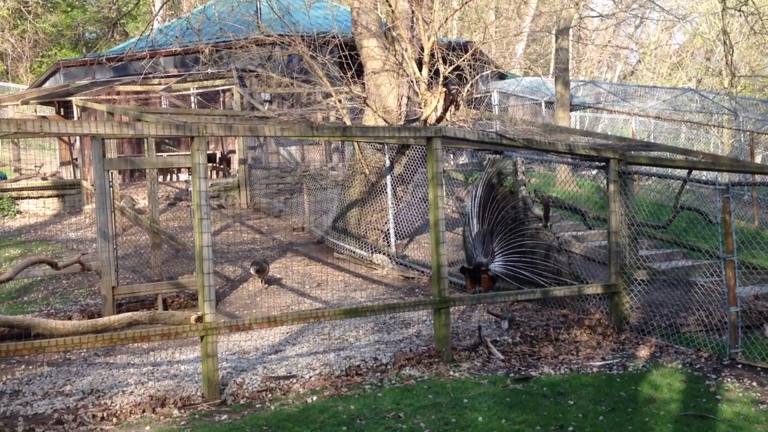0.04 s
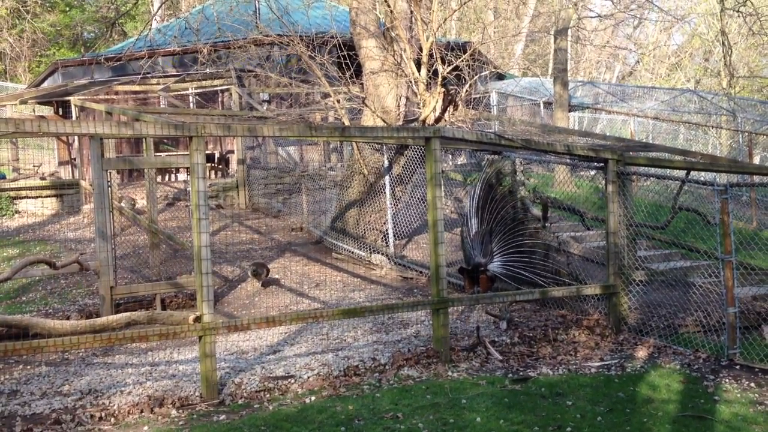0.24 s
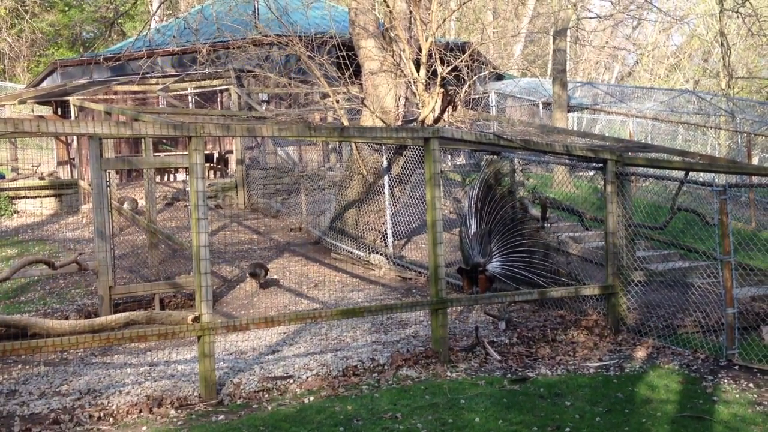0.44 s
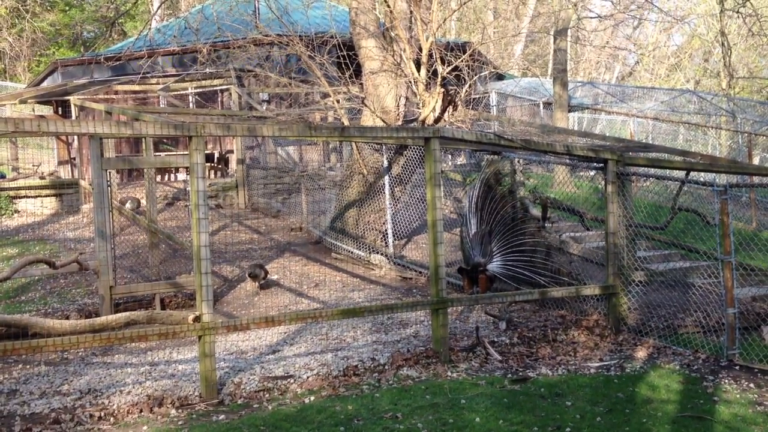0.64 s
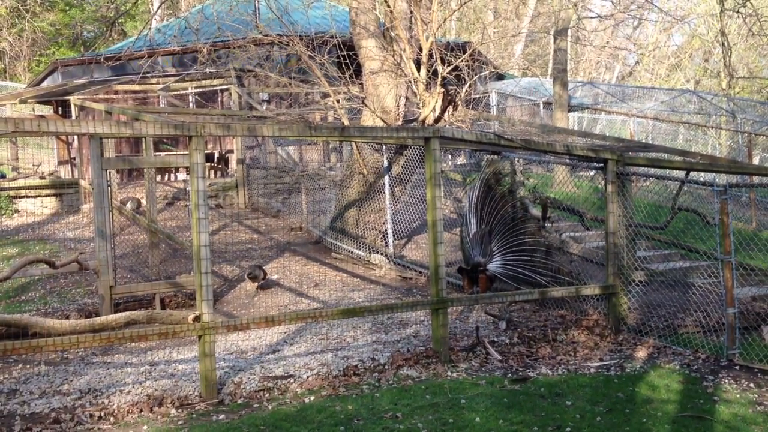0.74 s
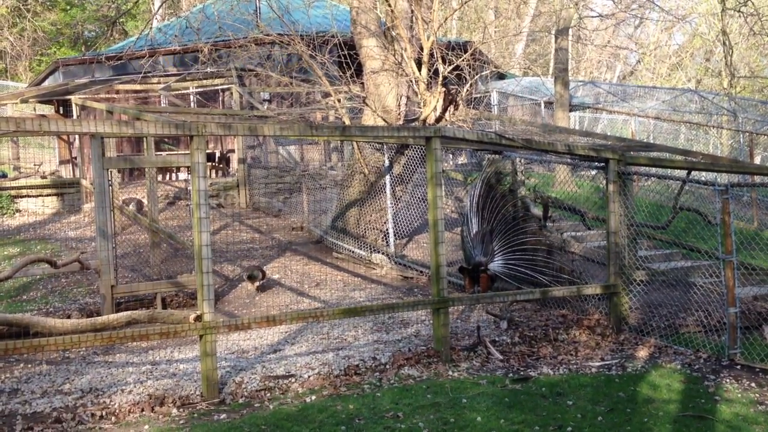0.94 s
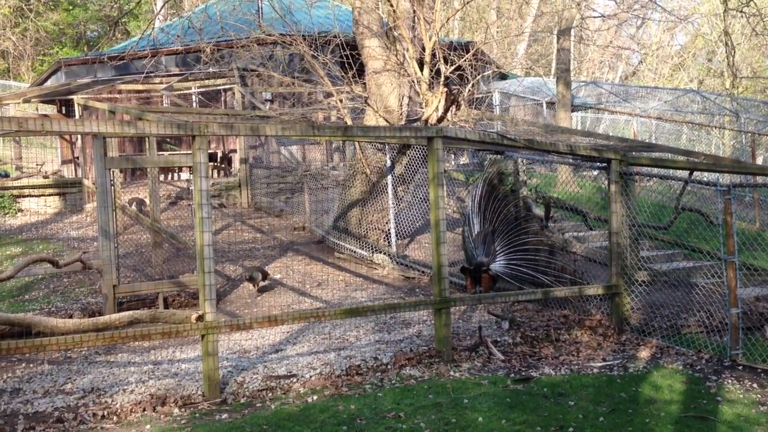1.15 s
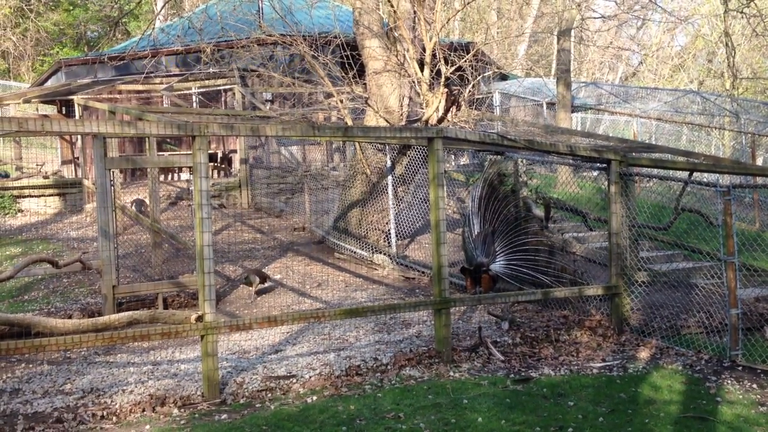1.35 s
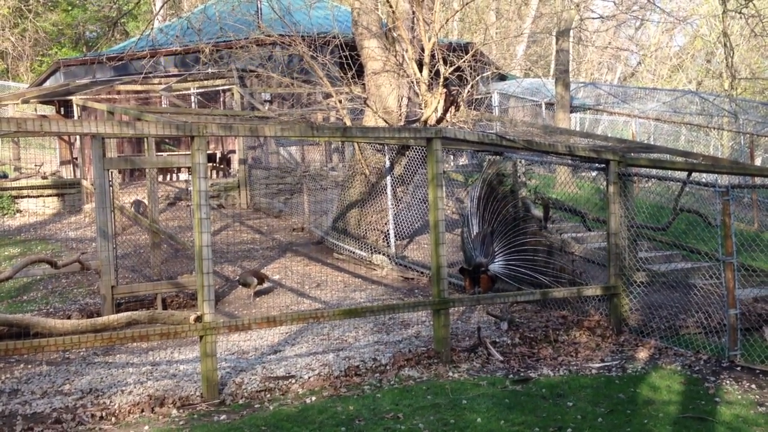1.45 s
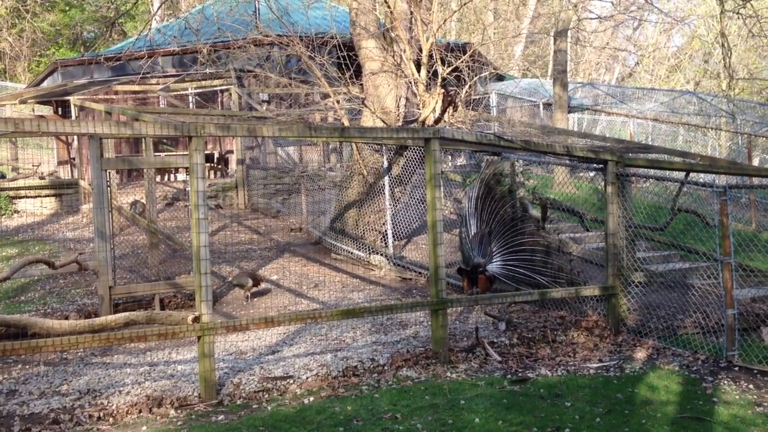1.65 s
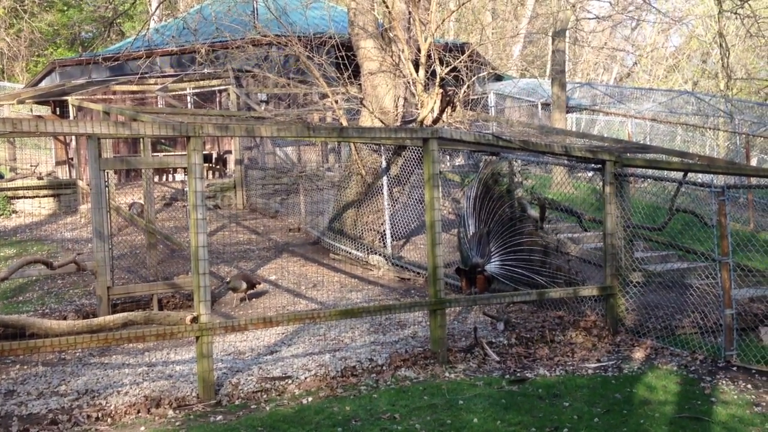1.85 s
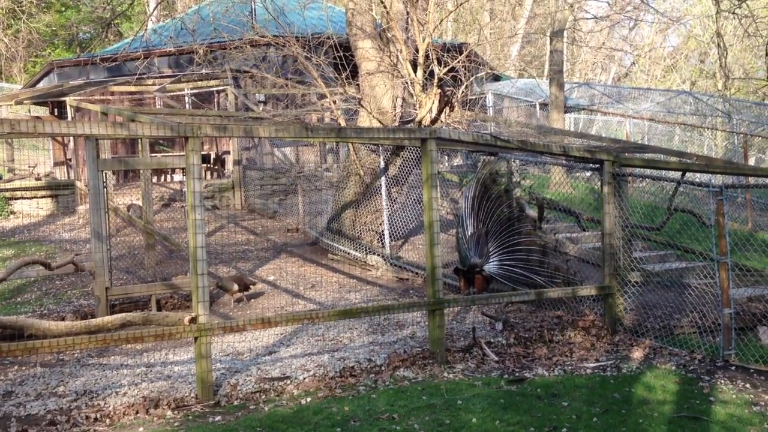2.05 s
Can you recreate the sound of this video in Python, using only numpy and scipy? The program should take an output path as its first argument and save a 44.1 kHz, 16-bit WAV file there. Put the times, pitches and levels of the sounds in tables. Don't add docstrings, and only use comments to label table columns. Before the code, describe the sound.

A peacock's single loud call dominates. First comes soft, low park air with very faint distant chirps, a feathery swish near 0.55 seconds and twig ticks around 0.75. At 1.13 dry clucks burst, then the voice stutters upward, opens into a bright, nasal, brassy arch around 1.6, and drops away by 1.95. A dove's faint hum lies beneath; a dull echo and quiet air remain.

```python
import sys
import numpy as np
from scipy import signal
from scipy.io import wavfile
from scipy.ndimage import uniform_filter1d

SR = 44100
rng = np.random.default_rng(int(sys.argv[2]) if len(sys.argv) > 2 else 0)


def transcribe(u):
    v = np.clip(np.atleast_2d(u).T, -1, 1)
    q = np.round(v * 32767).astype(np.int16)
    wavfile.write(sys.argv[1], SR, q)


def ratio_of_db(decibels):
    return 10 ** (np.asarray(decibels, float) / 20)


N = 92786

# pitch_hz [Hz], level_db [dB]
PARK_AIR = [(40, -27), (70, -2.5), (170, -1.5), (330, -5), (1000, -8.5), (2200, -23.5), (4800, -19.5),
            (7500, -36)]
# start_s [s], length_s [s], from_hz [Hz], to_hz [Hz], level_db [dB]
FAR_CHIRPS = [(-.03, 0.071, 5350, 3740, -60.5), (0.218, 0.047, 4820, 5180, -69.5),
              (0.294, .03, 3390, 4900, -73), (0.817, 0.039, 3720, 4780, -66),
              (0.86, 0.051, 5190, 3870, -65.5), (0.964, 0.089, 5210, 3780, -62.5),
              (1.165, 0.03, 4100, 3190, -57), (2.071, .06, 4280, 3300, -69.5)]
# start_s [s], peak_db [dB], pitch_hz [Hz], width_hz [Hz]
TWIG_TICKS = [(0.123, -35, 176, 73.5), (.122, -56, 420, 250), (.742, -29.5, 2300, 1540),
              (.742, -46, 6000, 3000), (.838, -44, 6000, 3000), (0.844, -47, 8000, 3000),
              (0.875, -36.5, 2040, 350), (1.095, -45, 3500, 4000), (1.096, -47, 1850, 120),
              (.622, -45.5, 7500, 2000), (1.558, -21, 9000, 9200), (1.57, -49, 9000, 8960)]
# time_s [s], centre_hz [Hz], level_db [dB]
WING_SWISH = [(.51, 5200, -74), (.55, 4600, -45.5), (.59, 3600, -45), (.64, 3200, -47), (.68, 3300, -54.5),
              (.76, 3400, -60), (.9, 3400, -67)]
# time_s [s], pitch_hz [Hz], level_db [dB]
DOVE_HUM = [(1.11, 165, -47), (1.17, 208.8, -48.5), (1.31, 220, -40), (1.44, 288, -47), (1.8, 270, -54),
            (1.86, 220.4, -47), (1.96, 256.2, -41.5), (2.02, 266, -49), (2.05, 250, -82.5)]
# centre_s [s], level_db [dB], length_s [s]
CLUCK_PUFFS = [(1.129, -33.5, 0.0065), (1.139, -22.5, 0.0079), (1.154, -25.5, 0.0098)]
# pitch_hz [Hz], width_hz [Hz], level_db [dB]
THROAT_RING = [(480, 230, -11.5), (1055, 150, -1), (2300, 170, -19.5), (11850, 5000, -48.5)]
# time_s [s], pitch_hz [Hz], level_db [dB], beak_opening [0-1]
CALL_EFFORT = [
    (1.172, 409.8, -20.5, 0.3),
    (1.22, 459.8, -12, 0),
    (1.27, 492.4, -3, 0.06),
    (1.4, 536.3, -4, 0),
    (1.49, 562.6, -4, 0.37),
    (1.62, 571.9, -0.5, 0.61),
    (1.77, 559.5, -2, 0.77),
    (1.84, 515.8, -7.5, 0.14),
    (1.955, 402.7, -34.5, 0.11),
]
# centre_s [s], depth_db [dB], closing_s [s], opening_s [s]
VOICE_CATCHES = [(1.177, 18, .003, .004), (1.196, 18.5, 0.0016, 0.0017), (1.209, 11, 0.0027, 0.0011),
                 (1.223, 15, 0.0017, 0.0053), (1.253, 22.5, 0.0068, 0.0017), (1.281, 20.5, 0.0057, 0.0052),
                 (1.319, 15.5, 0.0051, 0.002), (1.351, 7.5, 0.0036, .004), (1.394, 4, 0.0053, .002)]
# pitch_hz [Hz], width_hz [Hz], closed_db [dB], open_db [dB]
WINDPIPE = [(1161, 495, 18.5, 22.5), (1850, 830, -7.5, -15.5), (2590, 242, 18.5, 9), (3400, 390, -29.5, 17),
            (4000, 280, 5, -13), (4350, 9000, -23.5, -32.5), (5876, 550, -5, 29), (6490, 500, 13.5, 7),
            (7600, 1200, 4.5, -11), (9300, 700, 2, 8), (10650, 1500, -4, -15), (12500, 780, 12, 15.5),
            (15100, 3000, 2, 3)]
# delay_s [s], level_db [dB]
FAR_RETURNS = [(0.02, -25), (0.045, -39.5), (0.109, -40.5), (.19, -51.5), (.29, -61.5), (0.369, -74)]


def columns(rows):
    time_s, *values = np.transpose(rows)
    return [np.interp(np.arange(N) / SR, time_s, value) for value in values]


def drift(rate_hz):
    r = np.exp(-2 * np.pi * rate_hz / SR)
    x = signal.lfilter([1], [1, -2 * r, r * r], rng.standard_normal(N + SR))[SR:]
    return x / x.std()


def resonate(x, hz, width_hz):
    r = np.exp(-np.pi * width_hz / SR)
    return signal.lfilter([(1 - r * r) / 2, 0, (r * r - 1) / 2],
                          [1, -2 * r * np.cos(2 * np.pi * hz / SR), r * r], x)


def cut(x, hz, kind, order=2):
    return signal.sosfilt(signal.butter(order, hz, kind, fs=SR, output="sos"), x)


def air(patchy_db):
    level_db, hiss_db = -53, -82.5
    hiss_hz, hiss_width_hz = 12700, 6000
    settle = 9000
    white = rng.standard_normal((2, N + settle))
    edges = 35 * 2 ** np.arange(0, 9, .5)
    table_hz, table_db = np.transpose(PARK_AIR)
    bed = 0
    for k, (low, high) in enumerate(zip(edges, edges[1:])):
        band_db = np.interp(np.log(low * high) / 2, np.log(table_hz), table_db)
        gain_db = band_db + patchy_db * drift(9)
        bed = bed + ratio_of_db(gain_db) * cut(white[k % 2], [low, high], "band")[settle:]
    hiss = resonate(white[0, :N], hiss_hz, hiss_width_hz)
    hiss = resonate(hiss, hiss_hz, hiss_width_hz)
    return ratio_of_db(level_db) * bed / bed.std() + ratio_of_db(hiss_db) * hiss / hiss.std()


def chirps():
    bend, warble_depth, hoarse_depth = 1.8, .012, .45
    voices = ((1, 1, 0), (.9, .7, -3))
    t = np.arange(N) / SR
    warble = 1 + warble_depth * drift(220)
    out = 0
    for start_s, length_s, from_hz, to_hz, level_db in FAR_CHIRPS:
        progress = np.clip((t - start_s) / length_s, 0, 1)
        swell = np.sqrt(np.sin(np.pi * progress).clip(0))
        for start_ratio, end_ratio, voice_db in voices:
            first_hz, last_hz = from_hz * start_ratio, to_hz * end_ratio
            hz = (first_hz + (last_hz - first_hz) * progress ** bend) * warble
            whistle = np.sin(2 * np.pi * np.cumsum(hz) / SR)
            out = out + ratio_of_db(level_db + 9 + voice_db) * swell * whistle
    return out * ratio_of_db(1.6 * drift(80)) * (1 + hoarse_depth * drift(340))


def trees(x):
    wet_db, t60_s = -6, 0.52
    t = np.arange(SR // 2) / SR
    tail = rng.standard_normal(SR // 2) * ratio_of_db(-60 * t / t60_s)
    return ratio_of_db(wet_db) * signal.fftconvolve(x, tail / np.linalg.norm(tail))[:N]


def ticks():
    out = 0
    for start_s, peak_db, hz, width_hz in TWIG_TICKS:
        click = np.full(N, 1e-18)
        click[int(start_s * SR)] = 1
        ring = resonate(resonate(click, hz, width_hz), hz, 2 * width_hz)
        out = out + ratio_of_db(peak_db) * ring / np.abs(ring).max()
    return out


def swish():
    width_hz, rough_db = 535, 2
    hz, level_db = columns(WING_SWISH)
    carrier = np.exp(2j * np.pi * np.cumsum(hz) / SR)
    base = cut(rng.standard_normal((2, N)), width_hz, "low")
    band = np.real((base[0] + 1j * base[1]) * carrier)
    started = np.arange(N) > WING_SWISH[0][0] * SR
    return band / band.std() * ratio_of_db(level_db + rough_db * drift(40)) * started


def dove():
    hz, level_db = columns(DOVE_HUM)
    tone = np.sin(2 * np.pi * np.cumsum(hz) / SR)
    started = np.arange(N) > DOVE_HUM[0][0] * SR
    return ratio_of_db(level_db + 0.83 * drift(25)) * tone * started


def clucks():
    snap_db = 12.5
    t, puff = np.arange(N) / SR, 0
    for centre_s, level_db, length_s in CLUCK_PUFFS:
        shape = np.exp(-(np.abs(t - centre_s) / length_s) ** 2)
        puff = puff + ratio_of_db(level_db) * (t > centre_s) * shape
    snap = ratio_of_db(snap_db) * np.diff(puff, prepend=0).clip(0)
    puff = puff * rng.standard_normal(N) + snap
    out = 0
    for hz, width_hz, level_db in THROAT_RING:
        ring = resonate(resonate(puff, hz, width_hz), hz, 3 * width_hz)
        out = out + ratio_of_db(level_db) * np.sqrt(SR / width_hz) * ring
    return out


def tract(x, column):
    x = cut(x, 700, "low", order=1)
    x = cut(x, 330, "high")
    for hz, width_hz, *gains_db in WINDPIPE:
        q, w = np.pi * width_hz / SR, 2 * np.pi * hz / SR
        gain = ratio_of_db(gains_db[column])
        x = signal.lfilter([1 + q * gain, -2 * np.cos(w), 1 - q * gain],
                           [1 + q, -2 * np.cos(w), 1 - q], x)
    return x


def peacock():
    sag_per_db, jitter, start_jitter, steady_s = .0075, .0012, .02, 1.4
    tilt_db, dull_per_db, half_db = -6, .15, -48
    catch_noise_db, breath_db, rasp_db = -9, -23, -52
    t = np.arange(N) / SR
    hz, level_db, beak = columns(CALL_EFFORT)
    hz = uniform_filter1d(hz, int(.04 * SR))
    beak = np.clip(beak, 0, 1)

    catch_db = 0
    for centre_s, depth_db, closing_s, opening_s in VOICE_CATCHES:
        side_s = np.where(t < centre_s, closing_s, opening_s)
        catch_db = catch_db + depth_db * np.exp(-np.abs(t - centre_s) / side_s)
    unsteady = jitter + start_jitter * np.clip((steady_s - t) / 0.032, 0, 1)
    hz = hz * (1 - sag_per_db * catch_db + unsteady * drift(90))
    phase = 2 * np.pi * np.cumsum(hz) / SR

    slope_db = tilt_db + dull_per_db * level_db.clip(-40, 0) * (t > CALL_EFFORT[5][0])
    pulses = 0
    for k in range(1, 29):
        pulses = pulses - ratio_of_db(slope_db * np.log2(k)) * np.cos(k * phase)
    pulses = pulses * (1 + ratio_of_db(half_db + 7 * drift(9)) * np.cos(phase / 2))

    opening = 1 + np.cos(phase)
    leak = rng.standard_normal(N) * opening * ratio_of_db(catch_noise_db) * np.tanh(catch_db / 6)
    breath = cut(rng.standard_normal(N) * opening, 1800, "high")
    source = pulses + cut(leak, 3000, "low") + ratio_of_db(breath_db) * breath
    voice = (1 - beak) * tract(source, column=0) + beak * tract(source, column=1)
    voice = voice / np.sqrt(uniform_filter1d(voice ** 2, size=600) + 1e-9)
    fade_in = np.clip((t - CALL_EFFORT[0][0]) / 0.0053, 0, 1)
    fade_out = np.clip((CALL_EFFORT[-1][0] - t) / 0.051, 0, 1)
    effort = ratio_of_db(uniform_filter1d(level_db, size=900) - catch_db)

    rasp = ratio_of_db(rasp_db + 3 * drift(70)) * cut(rng.standard_normal(N), [5000, 14500], "band")
    rasp = rasp * (t > CLUCK_PUFFS[0][0]) * np.clip((1.45 - t) / .1, 0, 1)
    return voice * effort * fade_in * fade_out + rasp


def echoes(x):
    tail = np.zeros(SR // 2)
    for delay_s, level_db in FAR_RETURNS:
        smear = rng.standard_normal(400) * np.hanning(400)
        first = int(delay_s * SR)
        tail[first:first + 400] += ratio_of_db(level_db) * smear / np.linalg.norm(smear)
    return cut(signal.fftconvolve(x, tail)[:N], 1960, "low")


def scene():
    bird = peacock() + clucks()
    far = chirps() + swish()
    near_field = bird + echoes(bird)
    far_field = far + trees(far)
    return (near_field + far_field + ticks() + dove() + air(patchy_db=3.0))[None]


def band_limit(x):
    return signal.sosfilt(signal.butter(12, 15200, fs=SR, output="sos"), x)


def record(dry):
    limit_db, release_db_per_s = -.2, 8.5
    x = cut(dry, 87, "high", order=3)
    release_db = release_db_per_s * np.arange(N) / SR
    over_db = np.maximum(20 * np.log10(np.abs(x[0]) + 1e-9) - limit_db, 0)
    held_db = np.maximum.accumulate(over_db + release_db) - release_db
    held_db = uniform_filter1d(np.r_[held_db[88:], held_db[-88:]], size=176)
    return band_limit(np.clip(x * ratio_of_db(-held_db), -1, 1))


dry = scene()
out = record(dry)
transcribe(out)
```